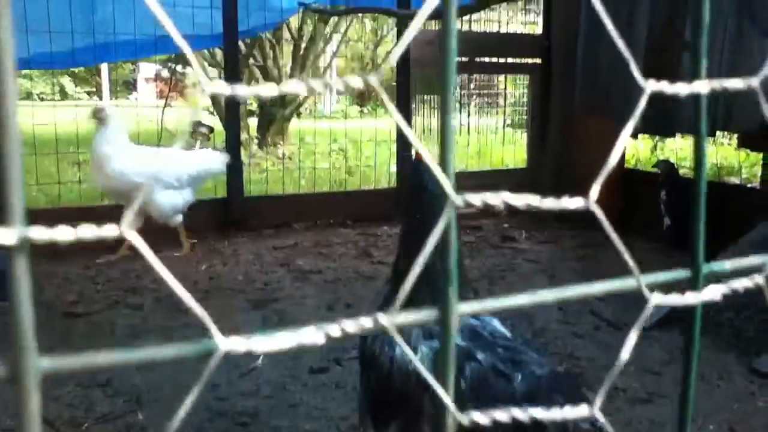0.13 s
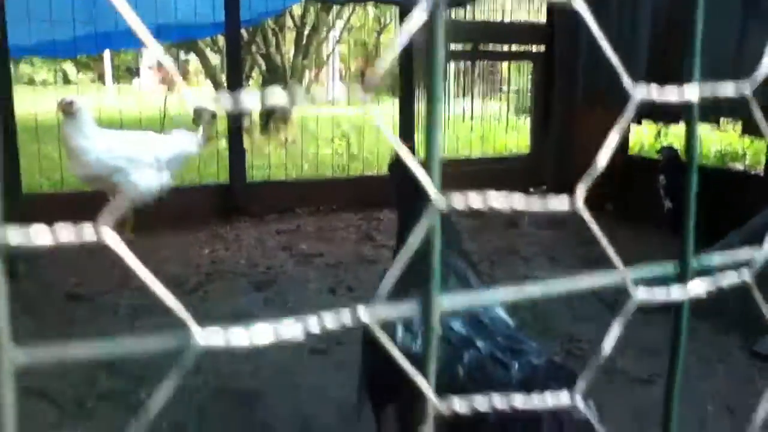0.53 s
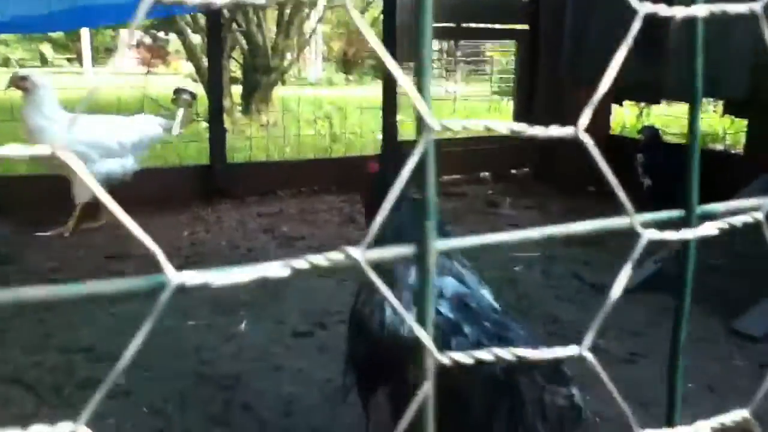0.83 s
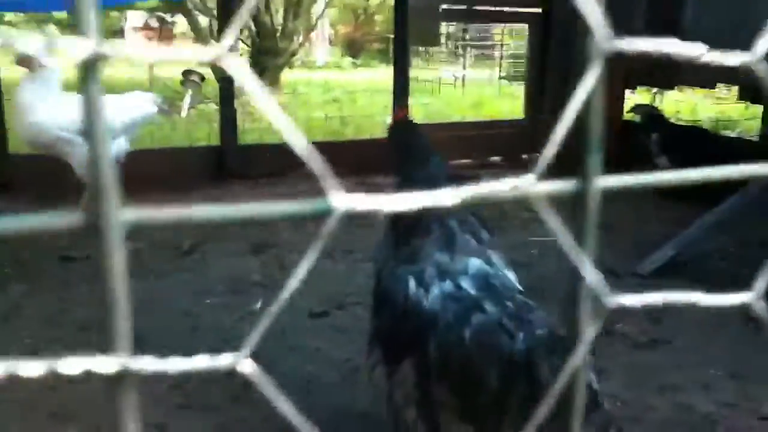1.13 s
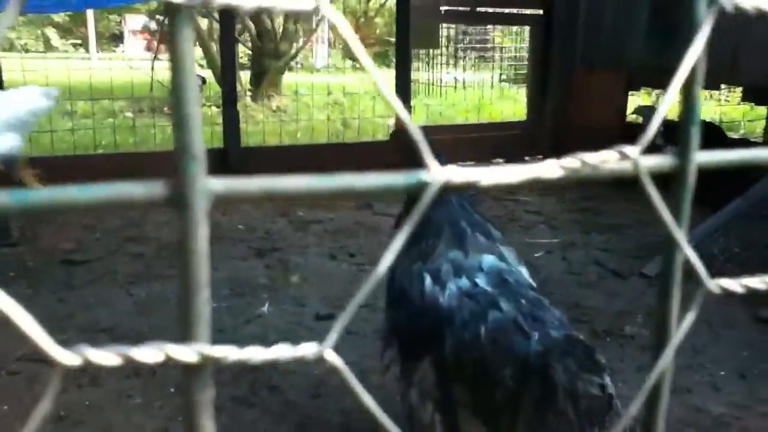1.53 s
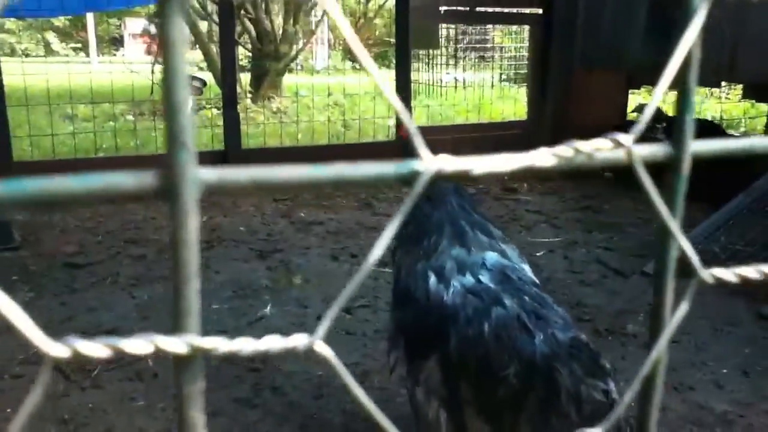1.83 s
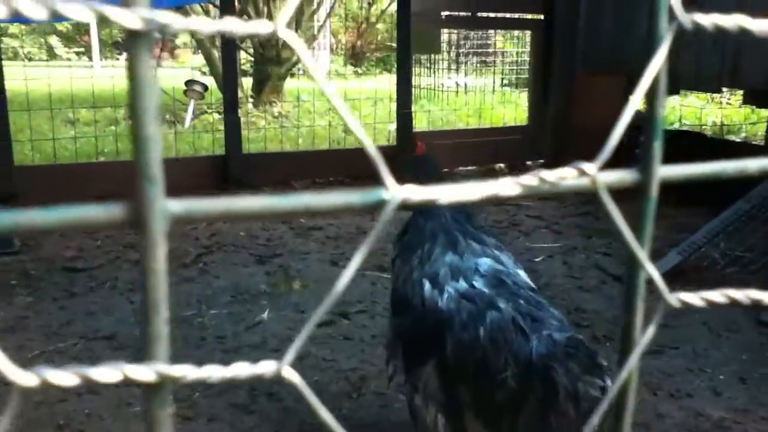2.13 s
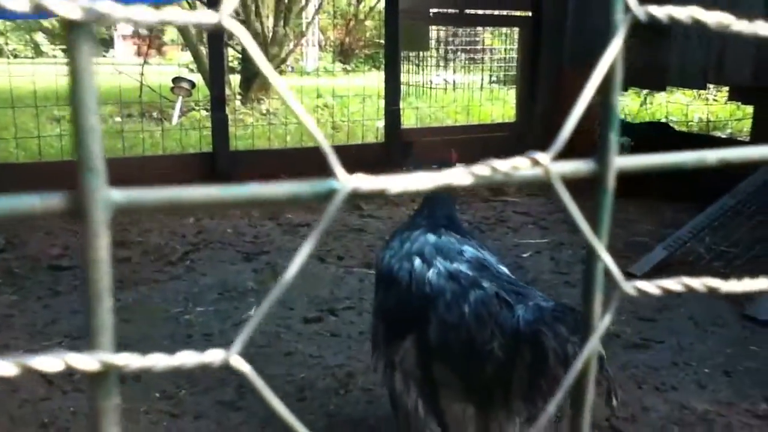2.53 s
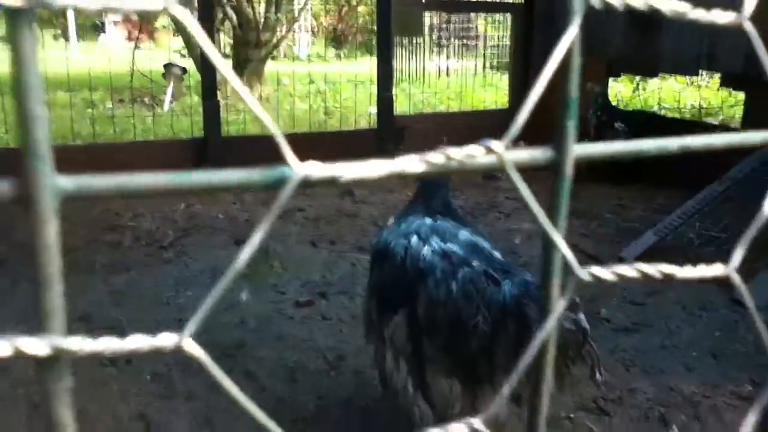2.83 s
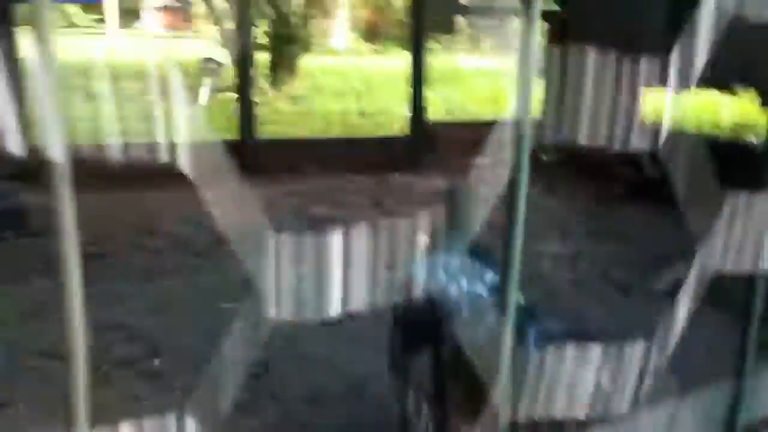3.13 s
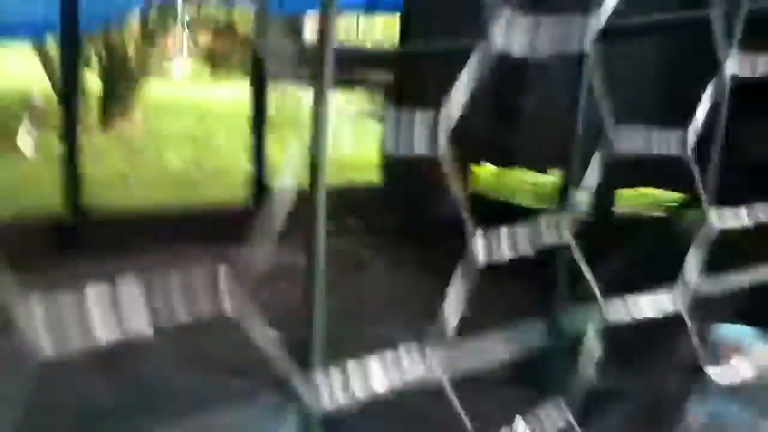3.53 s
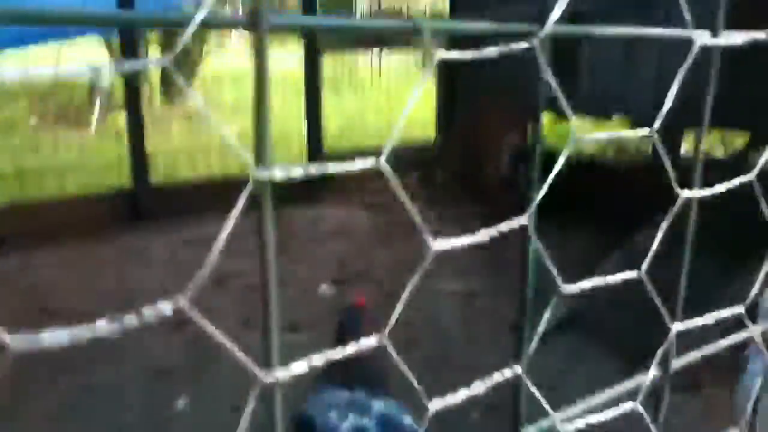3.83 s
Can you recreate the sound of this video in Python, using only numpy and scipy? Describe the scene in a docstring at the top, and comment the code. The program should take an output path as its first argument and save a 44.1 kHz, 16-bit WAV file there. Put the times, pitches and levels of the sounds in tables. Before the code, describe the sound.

A rooster crows once in a wire pen, then handling bumps and clicks hit the microphone.

```python
"""Under everything lies a quiet outdoor rumble and hiss, made of shaped noise; a dull bump and a faint scuff come first.
Then a rooster crows once in a wire-mesh pen: two short syllables and a long sagging one, clean when held, rasping at
their edges. Summed harmonics make the clear voice, and uneven puffs ringing the throat make the rasp.
One more dull bump falls within the crow. Afterwards a hand shifts on the microphone's housing: damped swings make
the bumps, shaped noise makes the rubbing, and short ringing snaps make a few sharp clicks."""
import sys
import numpy as np
from scipy import signal
from scipy.fft import rfft, irfft
from scipy.io import wavfile

SR = 44100
rng = np.random.default_rng(int(sys.argv[2]) if len(sys.argv) > 2 else 0)


def store_wav(level_fs):
    """Save 16-bit WAV to argv[1]."""
    pcm = np.round(np.clip(np.atleast_2d(level_fs), -1, 1) * 32767)
    wavfile.write(sys.argv[1], SR, pcm.T.astype(np.int16))


N = 176400
T = np.arange(N) / SR  # time of every sample, s


def from_db(db):
    """Turn decibels into a gain."""
    return 10 ** (np.asarray(db) / 20)


def rms_one(x):
    """Scale a sound to unit power."""
    return x / np.sqrt(np.mean(x ** 2) + 1e-20)


def in_time(rows):
    """Read each column of a table at every sample, with straight lines between the rows."""
    start_s, *columns = np.transpose(rows)
    return [np.interp(T, start_s, column) for column in columns]


def at_hz(points, hz):
    """Read a table of decibels at given frequencies, on a log-frequency axis."""
    point_hz, point_db = np.transpose(points)
    return np.interp(np.log(hz), np.log(point_hz), point_db)


def low_pass(x, hz, order=2):
    """Keep what lies below a frequency (Butterworth filter)."""
    sections = signal.butter(order, min(hz, SR / 2 - 1), fs=SR, output="sos")
    return signal.sosfilt(sections, x + 1e-18)


def drift(rate_hz):
    """Random wandering with spread 1, no faster than about the given rate."""
    wandering = low_pass(rng.standard_normal(N + SR), rate_hz)
    return rms_one(wandering[SR:])  # the first second lets the filter settle


def noise(colour):
    """Noise with a given spectrum and unit power."""
    hz = np.arange(N // 2 + 1) * SR / N + 1  # the 1 avoids log(0)
    spectrum = rfft(rng.standard_normal(N)) * from_db(at_hz(colour, hz))
    return rms_one(irfft(spectrum, N))


def resonate(x, hz, width):
    """Ring one resonance, with gain 1 at its peak."""
    r = np.exp(-np.pi * width / SR)
    feedback = [1, -2 * r * np.cos(2 * np.pi * hz / SR), r * r]
    return signal.lfilter(np.array([1, 0, -1]) * (1 - r * r) / 2, feedback, x)


def resonate_twice(x, hz, width):
    """Two equal resonances in a row give steeper sides."""
    return resonate(resonate(x, hz, width), hz, width)


def glide(x, hz, width):
    """A moving resonance: shift its centre down to 0 Hz, low-pass there, and shift back."""
    turn = np.exp(2j * np.pi * np.cumsum(hz) / SR)
    return np.real(low_pass(x / turn, width / 2) * turn)


def add(out, s, sound):
    """Mix a sound in at a time."""
    i = int(s * SR)
    out[i:i + len(sound)] += sound[:max(N - i, 0)]


def rooster():
    """As the syrinx roughens, pitch and strength flutter and the tone gives way to a pulsed rasp."""
    # the crow's pitch and roughness: start_s, pitch_hz, roughness (0-1)
    voice = [(.915, 600, .35), (.94, 702, .16), (.965, 745, .08), (.98, 740, .1), (.993, 694, .12),
             (1.016, 672, .14), (1.022, 690, 1), (1.08, 590, 1), (1.115, 500, 1), (1.14, 725, .55),
             (1.15, 800, .45), (1.159, 824, .3), (1.167, 828, .05), (1.255, 830, .03), (1.266, 822, .1),
             (1.275, 790, .33), (1.29, 725, .5), (1.31, 590, .9), (1.335, 600, .9), (1.35, 700, .55),
             (1.365, 802, .4), (1.376, 822, .25), (1.385, 829, .05), (1.45, 808, .02), (1.515, 798, .02),
             (1.56, 784, .03), (1.7, 776, .01), (1.912, 773, .01), (1.926, 751, .03), (1.96, 747, .02),
             (2.0, 732, .03), (2.04, 703, .03), (2.075, 696, .04), (2.088, 708, .14), (2.1, 703, .05),
             (2.121, 678, .08), (2.131, 660, .6), (2.139, 620, 1), (2.17, 570, 1)]
    # main throat resonance, which carries the third harmonic, one list per syllable group: start_s, level_db
    main_level = [
        [(.91, -72), (.943, -40.5), (.948, -49), (.968, -36), (.983, -37), (.989, -44), (.995, -38.5),
         (1.008, -41), (1.022, -52), (1.036, -48), (1.11, -58)],
        [(1.122, -58), (1.142, -44), (1.162, -39.5), (1.173, -49), (1.19, -37.5), (1.24, -42.5), (1.262, -38),
         (1.269, -45), (1.275, -35.5), (1.287, -36.5), (1.294, -49), (1.322, -62)],
        [(1.335, -61), (1.36, -44), (1.381, -38), (1.39, -50), (1.408, -41.5), (1.424, -58), (1.434, -43),
         (1.458, -45), (1.47, -39), (1.5, -35), (1.523, -36), (1.56, -50), (1.635, -45), (1.65, -39),
         (1.74, -36), (1.902, -35), (1.914, -39)],
        [(1.922, -54), (1.928, -33.5), (1.965, -32), (1.978, -38), (1.998, -38), (2.012, -50), (2.034, -45),
         (2.05, -37), (2.079, -37), (2.084, -52), (2.094, -39.5), (2.104, -36.5), (2.117, -39), (2.126, -48),
         (2.148, -49), (2.16, -65)],
    ]
    # the two lowest harmonics together: start_s, level_db
    low_level = [(0.906, -77), (0.956, -46.5), (1.094, -59.5), (1.132, -55), (1.14, -46), (1.172, -44),
                 (1.26, -47), (1.324, -66), (1.356, -47), (1.394, -44.5), (1.702, -56), (1.908, -60),
                 (1.928, -50.5), (2.002, -47), (2.032, -57.5), (2.116, -57.5), (2.15, -78)]
    # treble, which carries the fifth harmonic: start_s, level_db
    treble_level = [(.91, -74), (.962, -45.5), (.971, -58), (.986, -47), (1.03, -56), (1.13, -62),
                    (1.193, -41), (1.208, -50), (1.28, -51), (1.325, -72), (1.36, -51), (1.408, -41.5),
                    (1.457, -57), (1.472, -43), (1.52, -43), (1.553, -64), (1.607, -47), (1.68, -46),
                    (1.73, -56), (1.9, -56), (1.94, -50), (2.055, -47), (2.075, -53), (2.1, -47),
                    (2.15, -74)]
    jitter, jitter_hz = .042, 300  # pitch spread as a fraction, at full roughness
    waver, waver_hz = .0009, 40  # pitch spread as a fraction, always there
    flutter, flutter_hz = .5, 350  # strength spread as a fraction, at full roughness
    tone_loss = .92  # share of the tone's power lost at full roughness
    fade_s = 0.0067

    hz, rough = in_time(voice)
    rough = np.clip(rough, 0, 1)
    levels = [from_db(in_time(curve)[0]) for curve in (low_level, np.vstack(main_level), treble_level)]
    unsteady_hz = hz * (1 + jitter * rough * drift(jitter_hz) + waver * drift(waver_hz))
    phase = 2 * np.pi * np.cumsum(unsteady_hz) / SR
    tone = harmonics(hz, phase, *levels)
    tone = tone * (1 + flutter * rough * drift(flutter_hz)) * np.sqrt(1 - tone_loss * rough ** 2)
    inside_s = np.minimum(T - voice[0][0], voice[-1][0] - T)  # negative before and after the crow
    sounding = np.clip(inside_s / fade_s + 1, 0, 1)
    return sounding * (tone + rough * rasp(phase, *levels))


def harmonics(hz, phase, low, main, treble):
    """The clear voice: each harmonic has its own strength, and from the third up they shimmer."""
    # the fundamental against the second harmonic: start_s, level_db
    fundamental = [(1.12, -26), (1.18, 2.5), (1.35, -10.5), (1.4, 1), (1.54, -12), (1.88, -0.5),
                   (1.98, -10), (2.05, 0.5)]
    # the fourth harmonic against the fifth: start_s, level_db
    fourth_level = [(1.0, -9), (1.17, -1.5), (1.5, -15), (1.68, -19.5), (1.93, -6), (2.1, -13.5)]
    # the sixth against the fifth; swells in the long note, drops at the register break: start_s, level_db
    sixth_level = [(1.0, -19), (1.23, -8), (1.5, -18), (1.55, -1), (1.67, -20), (1.74, 1), (1.91, 2),
                   (1.93, -13)]
    # the bright edge, from the seventh harmonic upwards, against the fifth: start_s, level_db
    top_level = [(0.998, -17), (1.502, -25), (1.55, -21), (1.67, -20), (1.82, -9.5), (2.0, -21.5)]
    # unsteadiness of the third to sixth harmonics, least in the held note: start_s, spread_db
    shimmer = [(1.42, 1.4), (1.6, .2), (1.95, .3), (2.1, .9)]
    # colour of the beak on the upper harmonics: frequency_hz, level_db
    beak = [(4900, 1), (5250, -3), (5430, -17), (5800, -5), (6600, -14), (6930, 1), (7600, -6), (8200, -1),
            (9000, -11), (9300, -2), (9900, 0), (10100, -15), (10900, -8), (13500, -16)]
    top_shimmer_db, top_shimmer_hz = 2.2, 16

    curves = (fundamental, fourth_level, sixth_level, top_level)
    first, fourth, sixth, top = (from_db(in_time(curve)[0]) for curve in curves)
    shimmer_db, = in_time(shimmer)
    second = low / np.hypot(1, first)  # the lowest two share the low level's power
    gains = [second * first, second]
    for gain in (main, treble * fourth, treble, treble * sixth):
        gains.append(gain * from_db(shimmer_db * drift(62)))
    for k in range(7, 17):
        colour_db = at_hz(beak, k * hz) + top_shimmer_db * drift(top_shimmer_hz)
        gains.append(treble * top * from_db(colour_db))
    tone = sum(gain * np.sin(k * phase + rng.uniform(0, 2 * np.pi)) for k, gain in enumerate(gains, 1))
    return np.sqrt(2) * tone  # a sine of gain 1 then has unit power


def rasp(phase, low, main, treble):
    """The broken voice: one uneven puff per cycle, in clumps, rings the throat's resonances."""
    # centre of the main throat resonance; sinks between syllables, flicks up at the end: start_s, centre_hz
    throat_hz = [(1.045, 2250), (1.095, 1470), (1.12, 1450), (1.14, 2300), (1.28, 2330), (1.33, 2000),
                 (1.375, 2400), (2.125, 2050), (2.148, 2380), (2.17, 2100)]
    # steady resonances below and above it: centre_hz, width_hz, level_db
    side_modes = [(1517, 770, -0.5), (3370, 180, 2.5)]
    throat_width_hz, throat_db = 300, -1
    clump_db, clump_hz = 3, 140  # spread and speed of the puffs' strength
    spill_share = .2  # a broad ring around the main resonance

    each_cycle = np.diff(phase // (2 * np.pi), prepend=0)
    puffs = each_cycle * rng.choice([-1, 1], N) * from_db(clump_db * drift(clump_hz))
    centre, = in_time(throat_hz)
    spill = rms_one(resonate_twice(puffs, 2500, 1900))
    ring = rms_one(glide(puffs, centre, throat_width_hz))
    out = main * from_db(throat_db) * (ring + spill_share * spill)
    for level, (hz, width, db) in zip((low, treble), side_modes):
        out = out + level * from_db(db) * rms_one(resonate_twice(puffs, hz, width))
    return out


def pen(x):
    """The pen's hard surfaces return a few near echoes and a short faint tail."""
    # echoes against the direct sound: delay_s, level_db
    echoes = [(.0071, -23), (.0163, -21), (.029, -40)]
    tail_t60_s, tail_db = .13, -15  # time to fall by 60 dB; whole tail against the direct sound

    t = T[:SR // 2]
    tail = rng.standard_normal(len(t)) * from_db(-60 * t / tail_t60_s) * (t > .005)
    response = from_db(tail_db) * tail / np.linalg.norm(tail)
    for delay_s, db in echoes:
        response[int(delay_s * SR)] += from_db(db)
    return x + signal.fftconvolve(x, response)[:N]


def bumps():
    """Each bump is a damped swing and a short thud, muffled by the housing."""
    # bumps before muffling, t60_s being the time to fall by 60 dB: start_s, peak_db, pitch_hz, t60_s
    bump_list = [(0.298, -40.5, 115, 0.045), (1.603, -47, 99, 0.041), (2.81, -38, 108, 0.085),
                 (2.881, -44.5, 86, 0.21), (2.9899, -31.5, 381, 0.0092), (2.993, -36, 661, 0.024),
                 (2.9953, -25, 760, 0.015), (3.1135, -41, 690, 0.014), (3.118, -37, 378, 0.011),
                 (3.13, -39.5, 443, 0.0072), (3.186, -36, 120, 0.019), (3.4727, -24, 231, 0.018),
                 (3.471, -37.5, 604, 0.011), (3.4889, -30.5, 248, 0.0092), (3.4891, -27, 520, 0.03),
                 (3.5489, -26, 530, 0.017), (3.5504, -32, 1280, 0.0064), (3.552, -25.5, 300, 0.037),
                 (3.570, -24.5, 272, 0.014), (3.5782, -35.5, 606, 0.029), (3.58, -40, 1067, 0.037),
                 (3.592, -38.5, 206, 0.19), (3.638, -37, 167, 0.06), (3.713, -31, 111, 0.09),
                 (3.744, -22.5, 740, 0.0061), (3.76, -19.5, 300, 0.0056), (3.7602, -17.5, 82.4, 0.089),
                 (3.7654, -21, 205, 0.042), (3.798, -36.5, 470, 0.026), (3.929, -32.5, 600, 0.014),
                 (3.9471, -22, 880, 0.0077), (3.9478, -24, 150, 0.016), (3.97, -24.5, 102, 0.052),
                 (3.9731, -30.5, 145, 0.029), (3.981, -27.5, 373, 0.021), (3.992, -32.5, 980, 0.0087)]
    rise_cycles = 0.13
    thud_db, thud_decay_s, thud_top_hz = -15.5, 0.0035, 900  # level against the swing's peak
    housing_hz = 1500

    out, t = np.zeros(N), T[:SR // 4]
    for s, db, hz, t60 in bump_list:
        rise = 1 - np.exp(-t * hz / rise_cycles)
        swing = np.sin(2 * np.pi * hz * t) * from_db(-60 * t / t60) * rise
        thud = rms_one(low_pass(rng.standard_normal(len(t)), min(thud_top_hz, 3 * hz)))
        thud = thud * np.exp(-t / thud_decay_s)
        add(out, s, from_db(db) * (swing / np.abs(swing).max() + from_db(thud_db) * thud))
    return low_pass(out, housing_hz, order=4)


def clicks(grit):
    """Hard little contacts: a snap and an instant of grit in one broad, steep-sided resonance."""
    # sharp clicks: start_s, peak_db, centre_hz, grit_decay_s
    click_list = [(3.126, -48, 6550, 0.0017), (3.1298, -30, 6600, 0.00082), (3.1286, -48, 1510, 0.0051),
                  (3.1297, -49, 3170, .001), (3.475, -47.5, 1990, 0.0012), (3.5459, -32, 6800, 0.0016),
                  (3.5495, -41.5, 3070, 0.0021), (3.7438, -48.5, 2870, .001), (3.7984, -38, 4030, 0.0013),
                  (3.7987, -36, 6200, 0.0011), (3.8444, -40, 1600, 0.0011)]
    relative_width = .55  # width of each resonance as a fraction of its centre

    out, t = np.zeros(N), T[:SR // 20]
    for s, db, hz, decay in click_list:
        snap = (t == 0) + grit * rng.standard_normal(len(t)) * np.exp(-t / decay)
        tick = resonate_twice(snap, hz, relative_width * hz)
        add(out, s, from_db(db) * tick / np.abs(tick).max())
    return out


def rubbing():
    """Friction on the housing: dull, uneven noise from the hand, and a few brighter scuffs."""
    # strength of the rubbing: start_s, level_db
    rub_level = [(3.45, -50), (3.47, -58), (3.5, -52), (3.54, -52.5), (3.585, -39), (3.62, -64),
                 (3.7, -63.5), (3.76, -43.5), (3.83, -55), (3.855, -40.5), (3.89, -43), (3.93, -49.5),
                 (3.968, -50.5), (3.982, -28.5), (4.0, -38)]
    # its dull colour: frequency_hz, level_db
    rub_colour = [(40, -2.5), (160, 3), (300, 1), (500, -6), (800, -7), (1150, -25.5), (1700, -30),
                  (4000, -50)]
    # faint scuffs, each swelling and fading: centre_s, level_db, spread_s
    scuff_list = [(0.651, -58.5, 0.0078), (3.826, -55.5, 0.0032), (3.978, -51, 0.007)]
    # their brighter colour: frequency_hz, level_db
    scuff_colour = [(300, -31), (1200, 13.5), (2200, 16), (4500, 7.5), (7000, 0.5), (15000, -16)]
    uneven_db, uneven_hz = 0.96, 58

    strength = from_db(in_time(rub_level)[0] + uneven_db * drift(uneven_hz))
    rub = strength * noise(rub_colour) * (T > rub_level[0][0])
    scuffs = sum(from_db(db) * np.exp(-.5 * ((T - s) / spread) ** 2) for s, db, spread in scuff_list)
    return rub + scuffs * noise(scuff_colour)


def background():
    """Outdoor air: steady hiss over a rumble whose level heaves at random."""
    # colour of the air before the rumble heaves: frequency_hz, level_db (per Hz, relative)
    air_colour = [(15, -69.5), (25, -12.5), (80, 2.5), (141, 2), (392, -4), (637, -10), (1180, -16),
                  (14600, -22), (15800, -25)]
    air_db = -58.5
    swell_db, swell_hz, rumble_top_hz = 4, 36, 300

    air = from_db(air_db) * noise(air_colour)
    rumble = low_pass(air, rumble_top_hz, order=1)
    return air + rumble * (from_db(swell_db * drift(swell_hz)) - 1)  # only the low part changes level


def scene():
    """The crow in the pen, the handling noise and the background."""
    handling = bumps() + clicks(grit=0.093) + rubbing()
    return (pen(rooster()) + handling + background())[None]


def record(dry):
    """A steep low-pass filter cuts off the top of the treble."""
    cutoff_hz = 15900
    sections = signal.ellip(10, .1, 70, cutoff_hz, fs=SR, output="sos")
    return signal.sosfilt(sections, dry)


dry = scene()
out = record(dry)
store_wav(out)
```